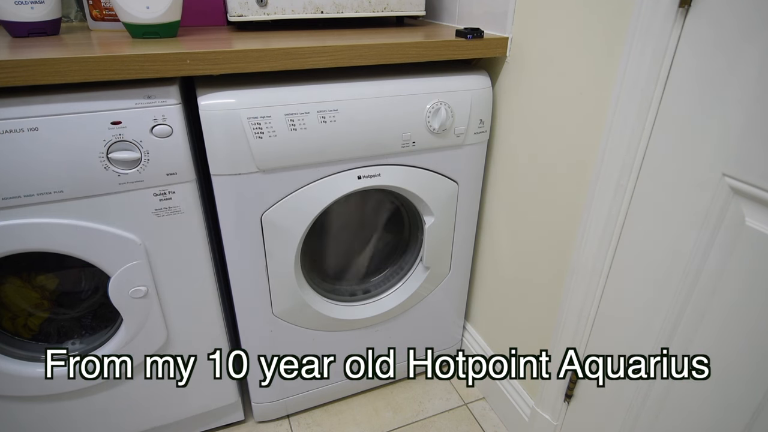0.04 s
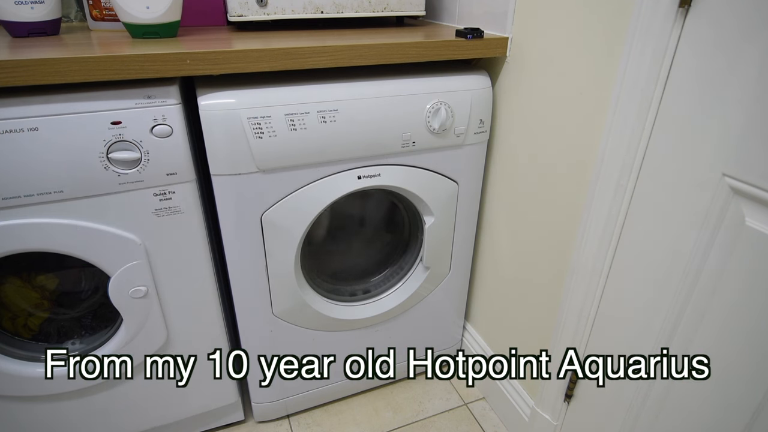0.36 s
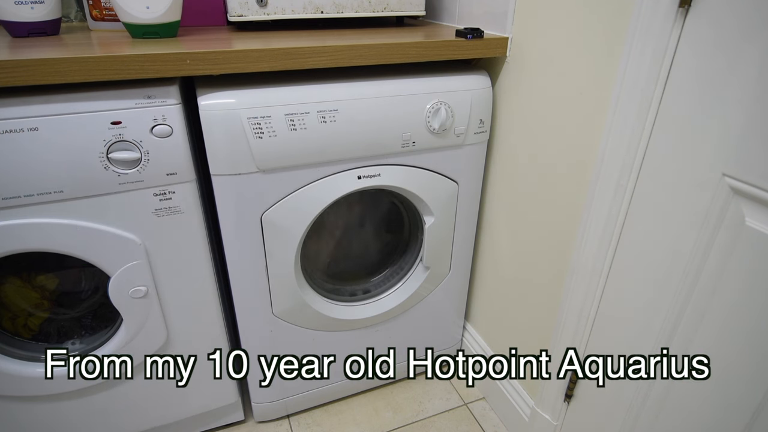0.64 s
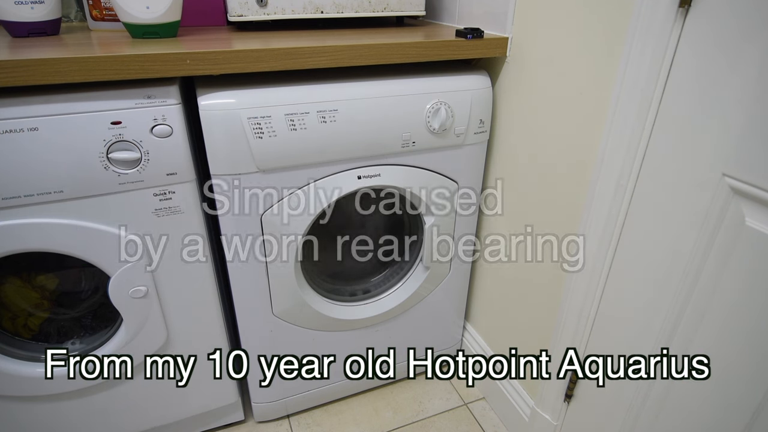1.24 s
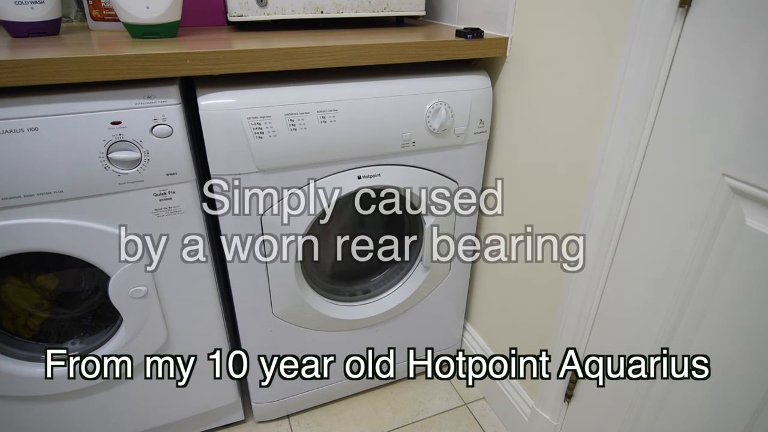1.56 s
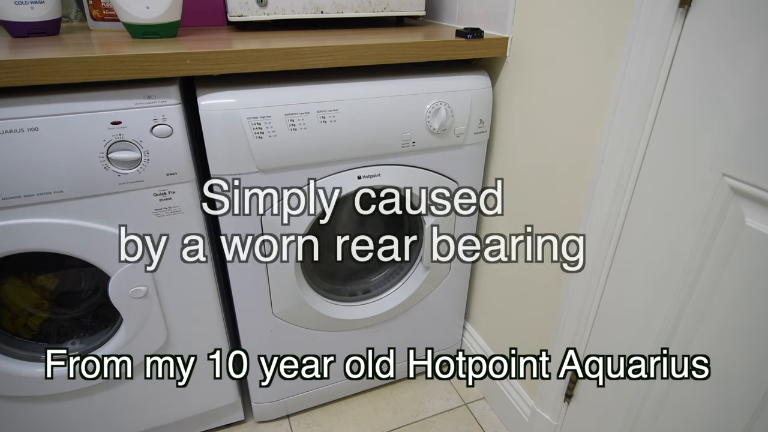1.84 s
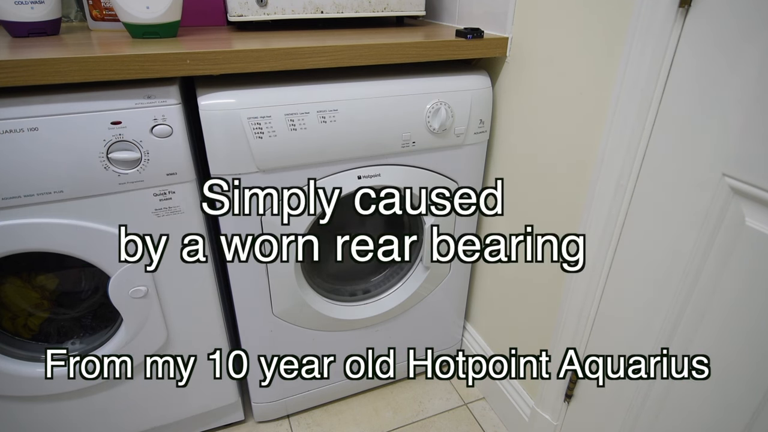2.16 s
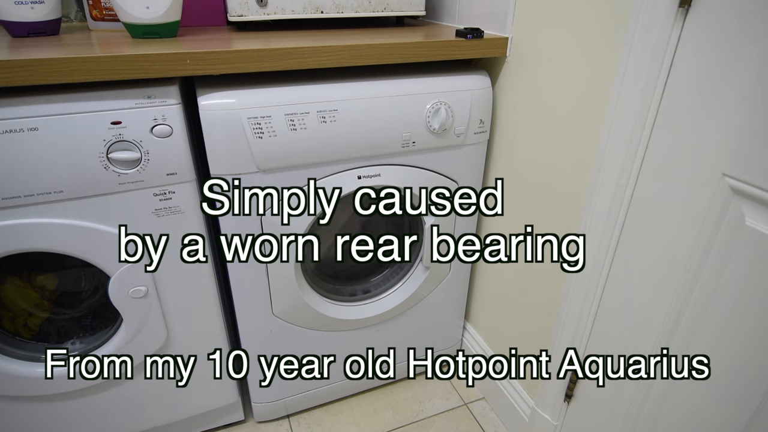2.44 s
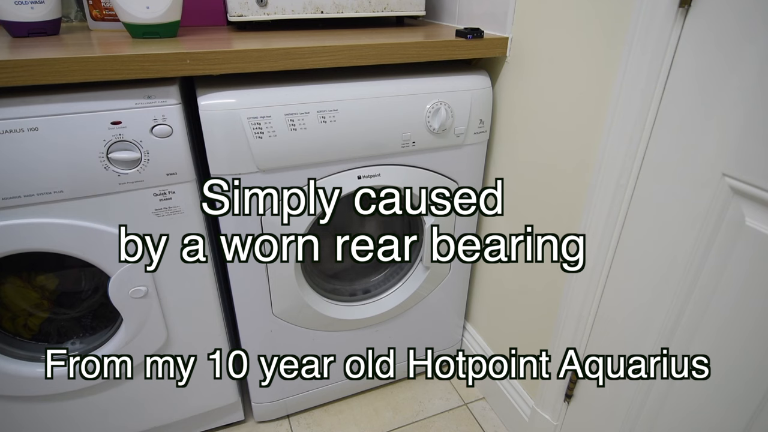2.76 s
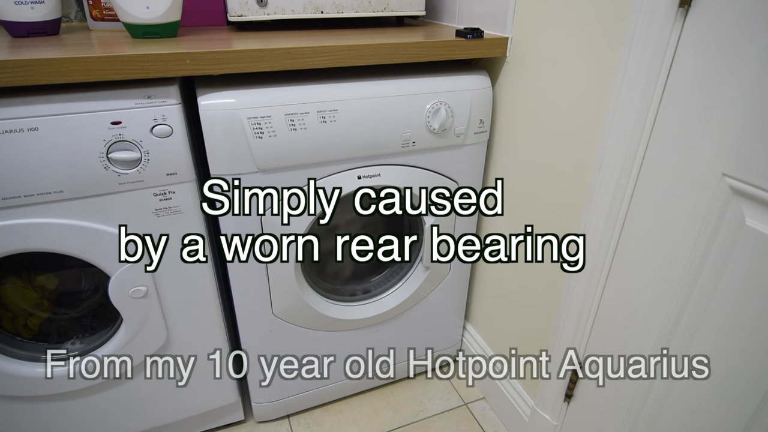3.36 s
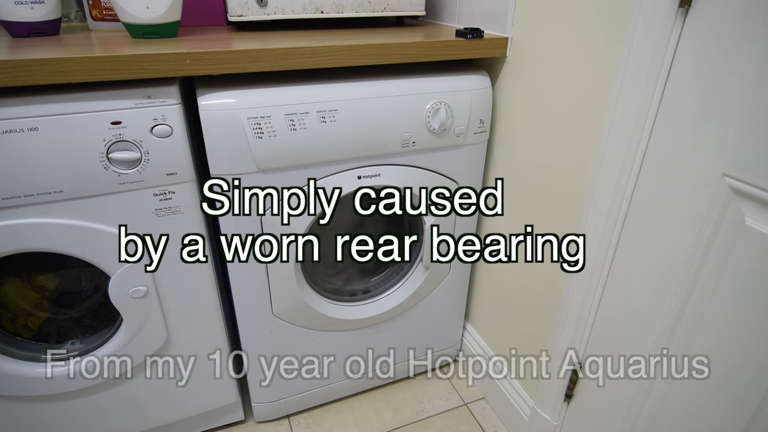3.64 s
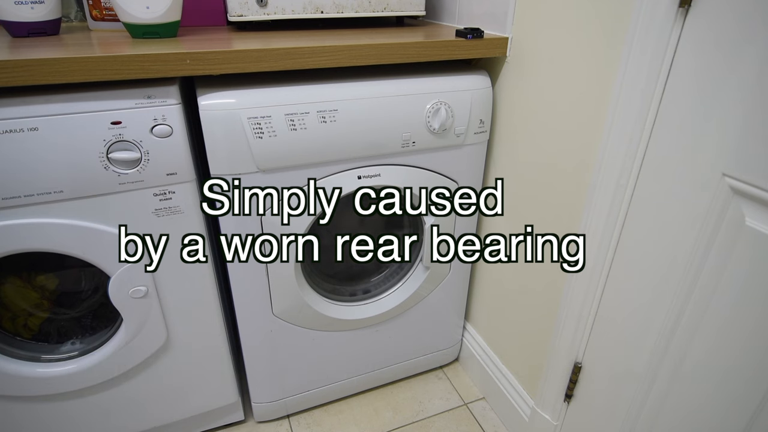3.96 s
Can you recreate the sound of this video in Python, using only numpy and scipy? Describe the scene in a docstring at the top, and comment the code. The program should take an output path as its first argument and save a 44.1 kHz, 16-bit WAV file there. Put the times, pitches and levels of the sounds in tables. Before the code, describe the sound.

A tumble dryer's worn bearing squeals loudly for all four seconds, holding one high pitch with a fluttering, metallic rasp. The squeal weakens briefly around 1.5 seconds and again near 2.8, and is harshest from about 1.9 to 2.5 and near the end. Underneath, the motor hums and the fan blows, with a faint tick at 0.7 seconds and a dull knock at 2.2, in a small room.

```python
"""A loud squeal near 940 Hz: the worn rear bearing of a tumble dryer in a small utility room.
The dry bearing sticks and slips once per cycle; more friction turns the squeal bright and rasping.
At times one overtone rings out, or strong and weak slips alternate and add half orders.
Below it the motor hums and the fan blows; something ticks once in the drum and knocks once."""
import sys
import numpy as np
from scipy import signal
from scipy.fft import rfft, irfft, next_fast_len
from scipy.io import wavfile
from scipy.ndimage import uniform_filter1d

SR = 44100
rng = np.random.default_rng(int(sys.argv[2]) if len(sys.argv) > 2 else 0)


def output_pcm(signal):
    """Save a mono or channel-first signal as 16-bit PCM at the path in sys.argv[1].

    Samples are clipped to [-1, 1] before scaling.
    """
    pcm = np.clip(np.atleast_2d(signal).T, -1, 1) * 32767
    wavfile.write(sys.argv[1], SR, np.round(pcm).astype(np.int16))


N = 176400
T = np.arange(N) / SR

# motor and fan tones: (frequency [Hz], level [dB], waver [dB])
HUM_TONES = [(99.4, -53.5, 1.5), (157.6, -56.5, 5), (354.5, -41.5, 1), (445.8, -44, 2), (1291, -59, 5.5),
             (1390, -53, 3.5)]
# air and drum rumble: (frequency [Hz], relative density [dB])
AIR_SPECTRUM = [(30, -35), (60, -14), (120, -8), (165, 2), (230, -2), (350, 1.5), (500, -1), (850, -2.5),
                (1150, -13), (2000, -12), (4000, -20), (8000, -39.5), (15000, -50.5)]
# tick, knock: (onset [s])
CONTACT_ONSETS_S = (.651, 2.178)
# tick, knock: (level before filtering [dB], rise [s], t60 [s], low edge [Hz], high edge [Hz])
CONTACT_BURSTS = [(-19.5, .0003, .02, 3600, 12000), (3.5, .012, .11, 660, 750)]
# stick-slip rate: (time [s], rate [Hz])
SLIP_RATE_HZ = [(0, 924.5), (.36, 951.8), (.56, 932.6), (.73, 943), (.81, 932.2), (1.18, 932),
                (1.32, 939.6), (1.48, 951.6), (1.62, 932.7), (1.83, 945.1), (1.9, 932), (2.7, 936.8),
                (2.93, 947.7), (3.15, 936.3), (3.36, 939.1), (3.45, 924), (3.6, 943.5), (4, 936.3)]
# bearing friction: (time [s], level [dB])
FRICTION_DB = [(0.05, -37), (0.18, -49), (0.55, -48), (0.58, -40.5), (0.74, -47), (0.83, -37),
               (1.04, -47.5), (1.14, -35.5), (1.27, -49.5), (1.36, -46.5), (1.6, -76), (1.69, -49.5),
               (1.82, -51), (1.91, -35.5), (2.1, -39.5), (2.44, -40), (2.54, -52), (2.67, -46),
               (2.79, -66.5), (3.07, -39.5), (3.37, -50.5), (3.45, -40), (3.53, -56.5), (3.65, -52.5),
               (3.75, -41), (4.0, -43.5)]
# rubbing metal: (frequency [Hz], relative density [dB])
RASP_SPECTRUM = [(60, -43), (300, -7), (600, -4.5), (850, 2), (1120, -4), (1550, -7), (1900, 0),
                 (2400, -2.5), (3200, 1), (4800, -1.5), (7000, -6.5), (10000, -15), (15500, -27.5)]
# squeal fundamental: (time [s], level [dB])
FUNDAMENTAL_DB = [(0.03, -11.5), (0.2, -15), (0.33, -20), (0.38, -15.5), (0.445, -20), (0.5, -14.5),
                  (0.78, -10.5), (0.85, -17), (0.94, -12), (1.0, -16.5), (1.18, -12.5), (1.38, -16.5),
                  (1.45, -27), (1.56, -29), (1.68, -18), (1.77, -17.5), (1.88, -11), (2.1, -13.3),
                  (2.66, -14.5), (2.72, -24), (2.85, -29.5), (2.97, -11.5), (3.24, -12.5), (3.34, -17),
                  (3.53, -12.5), (3.62, -20.5), (3.88, -9.5), (4.0, -13)]
# dips of the fundamental: (time [s])
STUTTER_TIMES_S = [0.147, 1.256, 1.455, 1.55, 1.755, 3.492, 3.552]
# harmonic 2: (time [s], level [dB])
SECOND_DB = [(0.03, -24.5), (0.37, -44.5), (0.68, -28.5), (0.76, -35.5), (0.79, -25), (1.32, -31.5),
             (1.569, -53), (1.89, -26.5), (2.58, -27), (2.82, -56), (3.15, -28), (3.7, -36), (4.0, -26.5)]
# harmonic 3: (time [s], level [dB])
THIRD_DB = [(0.08, -27), (0.2, -34), (0.5, -39.5), (0.8, -31.5), (0.87, -20), (0.93, -26), (1.111, -21),
            (1.16, -30), (1.22, -20), (1.27, -30.5), (1.56, -52), (1.87, -32.5), (1.98, -22), (2.46, -26.5),
            (2.55, -33.5), (2.72, -26), (2.809, -58), (3.071, -28.5), (3.45, -26.5), (3.67, -48),
            (3.719, -24), (3.87, -25.5), (4.0, -37)]
# harmonics 4-8: (order, level at reference friction [dB], slope against friction [dB/dB])
MID_HARMONICS = [(4, -32, 1.02), (5, -35, 1.14), (6, -36.5, 1.36), (7, -45.5, 1.2), (8, -51, 1.3)]
# one harmonic rings and holds: (start [s], end [s], order, level [dB])
RING_SPELLS = [(1.95, 2.317, 4, -30.5), (2.07, 2.328, 8, -43), (3.0, 3.27, 6, -38), (3.707, 3.823, 5, -33),
               (3.706, 3.93, 7, -38.5), (3.76, 3.982, 6, -34.5)]
# strong and weak slips alternate: (start [s], end [s])
ALTERNATING_SPELLS = [(.81, 0.878), (1.879, 2.48), (3.81, 4.0)]

FRICTION_REF_DB = -39
SHAFT_HZ, MAINS_BUZZ_HZ, THROB_HZ = 45.1, 100, 23.2
FLUTTER_DB, OVERTONE_WET_DB = 3.5, 1


def from_db(db):
    """Decibels to gain."""
    return 10 ** (np.asarray(db) / 20)


def unit_rms(x):
    """Scale to rms 1."""
    return x / np.sqrt(np.mean(x ** 2) + 1e-20)


def curve(rows):
    """Breakpoints to samples, corners rounded."""
    return uniform_filter1d(np.interp(T, *np.transpose(rows)), size=700, mode="nearest")


def drift(corner_hz):
    """Low-passed random motion, rms 1."""
    hop = 40
    pole = np.exp(-2 * np.pi * corner_hz * hop / SR)
    white = rng.standard_normal(N // hop + 2002)
    slow = signal.lfilter([1], [1, -2 * pole, pole * pole], white)[2000:]
    return np.interp(np.arange(N) / hop, np.arange(len(slow)), unit_rms(slow))


def sine(hz):
    """Modulator, peak 1."""
    return np.sin(2 * np.pi * hz * T)


def tone(phase, rms_db):
    """Sine at an rms level."""
    return np.sqrt(2) * from_db(rms_db) * np.sin(phase)


def noise(spectrum):
    """Coloured noise, rms 1."""
    hz, db = np.transpose(spectrum)
    bins_hz = np.maximum(np.arange(N // 2 + 1) * SR / N, 1)
    colour = from_db(np.interp(np.log(bins_hz), np.log(hz), db))
    return unit_rms(irfft(rfft(rng.standard_normal(N)) * colour, N))


def spell(start_s, end_s, fade_s=.032):
    """Gate with linear fades."""
    return np.clip(np.minimum(T - start_s, end_s - T) / fade_s + .5, 0, 1)


def in_room(x, wet_db, t60_s=.16, fade_in_s=.03):
    """Direct sound plus hard-wall echoes from twelve feedback delays; power unchanged."""
    size = next_fast_len(N + SR)
    fade_in = np.sin(np.pi / 2 * np.minimum(T / fade_in_s, 1)) ** 2
    spectrum = rfft(x * fade_in, size)
    omega = 2 * np.pi * np.arange(len(spectrum)) * SR / size
    walls = 0
    for k, lag_s in enumerate(rng.uniform(.005, .035, size=12)):
        echo = from_db(-60 * lag_s / t60_s) * np.exp(-1j * omega * lag_s)
        walls = walls + (-1) ** k * echo / (1 - echo)
    reverb = unit_rms(irfft(spectrum * walls, size)[:N]) * np.std(x)
    return unit_rms(x + from_db(wet_db) * reverb) * np.std(x)


def motor_and_fan(air_db=-41.5):
    """Wavering tones over the rush of air."""
    hum = 0
    for hz, db, waver_db in HUM_TONES:
        phase = 2 * np.pi * hz * T + .27 * waver_db * drift(4.6)
        hum = hum + tone(phase, db + waver_db * drift(11.8))
    return hum + from_db(air_db) * noise(AIR_SPECTRUM)


def drum_contacts():
    """A sharp tick and a dull knock in the drum: decaying bands of noise."""
    out = 0
    for onset_s, (db, rise_s, t60_s, *band_hz) in zip(CONTACT_ONSETS_S, CONTACT_BURSTS):
        age_s = np.maximum(T - onset_s, 0)
        envelope = (1 - np.exp(-age_s / rise_s)) * from_db(db - 60 * age_s / t60_s)
        bandpass = signal.butter(2, band_hz, "band", fs=SR, output="sos")
        out = out + signal.sosfilt(bandpass, envelope * rng.standard_normal(N))
    return in_room(out, wet_db=-7)


def slip_phase(jitter_hz=2.32, wander_hz=.91, shaft_swing_hz=.18, buzz_swing_hz=2):
    """Stick-slip phase [rad], jittered and shaken by the motor."""
    hz = curve(SLIP_RATE_HZ) + jitter_hz * drift(138) + wander_hz * drift(15.6)
    hz = hz + shaft_swing_hz * sine(SHAFT_HZ) + buzz_swing_hz * sine(MAINS_BUZZ_HZ)
    return 2 * np.pi * np.cumsum(hz) / SR


def rasp(phase, friction_db, base_db=-34):
    """Rubbing noise, released at each slip and pulsing with the motor."""
    slip_pulse = 1 + .44 * np.sin(phase)
    motor_pulse = 1 + .19 * sine(MAINS_BUZZ_HZ) + .085 * sine(THROB_HZ)
    gain = from_db(base_db + .7 * friction_db)
    return gain * unit_rms(slip_pulse * motor_pulse) * noise(RASP_SPECTRUM)


def half_orders(phase, base_db=-38.5, fall_db_per_octave=10):
    """Orders 1.5-5.5, while strong and weak slips alternate."""
    out = 0
    for order in np.arange(1.5, 6):
        db = base_db - fall_db_per_octave * np.log2(order / 1.5)
        out = out + tone(order * phase, db + FLUTTER_DB * drift(15))
    return out * sum(spell(start_s, end_s) for start_s, end_s in ALTERNATING_SPELLS)


def high_harmonics(phase, friction_db, base_db=-56, fall_db_per_order=2.9):
    """Orders 9-16: friction brightens the squeal."""
    ninth_db = base_db + 1.05 * friction_db
    return sum(tone(order * phase, ninth_db - fall_db_per_order * (order - 9)) for order in range(9, 17))


def mid_harmonics(phase, friction_db):
    """Orders 4-8 grow with friction; a ringing one holds its level."""
    out = 0
    for order, db, slope in MID_HARMONICS:
        gain = from_db(db + slope * friction_db + FLUTTER_DB * drift(11))
        for start_s, end_s, ring_order, ring_db in RING_SPELLS:
            if ring_order == order:
                gain = gain + spell(start_s, end_s) * (from_db(ring_db) - gain)
        out = out + in_room(gain * tone(order * phase, 0), OVERTONE_WET_DB)
    return out


def low_harmonics(phase, dip_db=10, dip_decay_s=.016, flutter_db=2.5):
    """Orders 1-3: the fundamental falters briefly, the other two flutter."""
    dips = sum(np.exp(-np.abs(T - time_s) / dip_decay_s) for time_s in STUTTER_TIMES_S)
    out = in_room(tone(phase, curve(FUNDAMENTAL_DB) - dip_db * dips), wet_db=-12)
    for order, levels in ((2, SECOND_DB), (3, THIRD_DB)):
        db = curve(levels) + flutter_db * drift(8.6)
        out = out + in_room(tone(order * phase, db), wet_db=-5)
    return out


def squeal(phase, friction_db):
    """Stick-slip tones; friction deepens the shaft tremolo and makes the slips uneven."""
    tremolo = .048 * from_db(friction_db / 2) * sine(SHAFT_HZ)
    roughness = .028 * from_db(1.4 * friction_db) * drift(140)
    body = low_harmonics(phase) + mid_harmonics(phase, friction_db)
    edge = in_room(high_harmonics(phase, friction_db) + half_orders(phase), OVERTONE_WET_DB)
    return (1 + tremolo + roughness) * (body + edge)


def scene():
    """The bearing over the running machine, mono."""
    phase = slip_phase()
    friction_db = curve(FRICTION_DB) - FRICTION_REF_DB
    bearing = squeal(phase, friction_db) + rasp(phase, friction_db)
    return (bearing + motor_and_fan() + drum_contacts())[None]


def record(dry):
    """Steep low-pass."""
    cutoff_hz = 15700
    return signal.sosfilt(signal.ellip(12, .1, 90, cutoff_hz, fs=SR, output="sos"), dry)


dry = scene()
out = record(dry)
output_pcm(out)
```